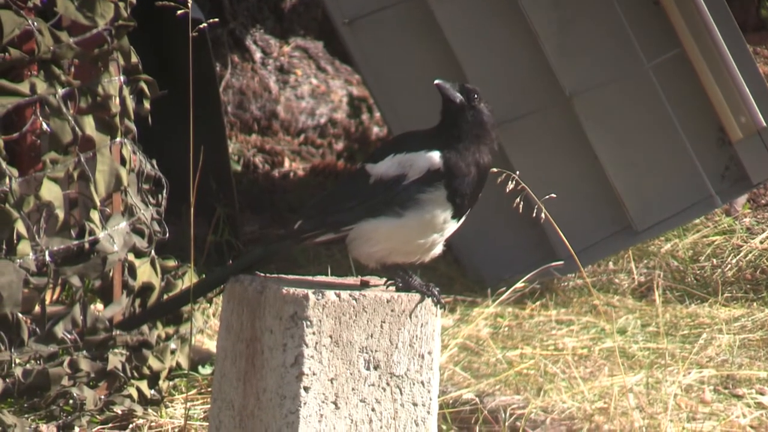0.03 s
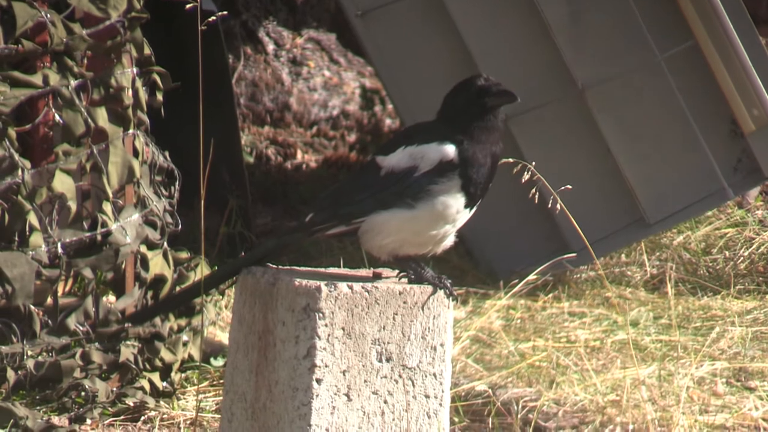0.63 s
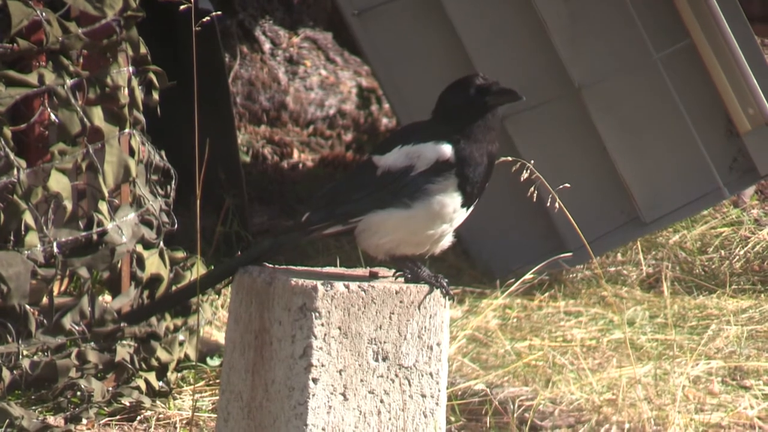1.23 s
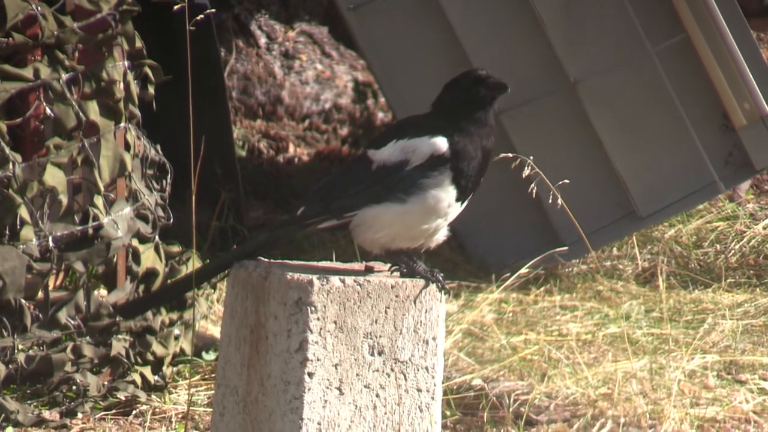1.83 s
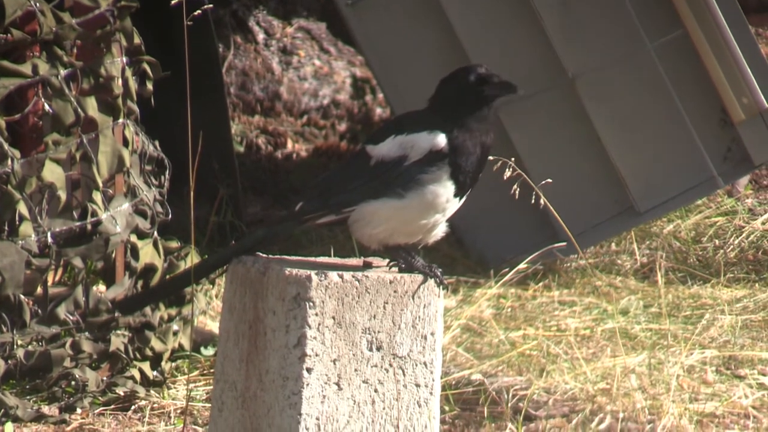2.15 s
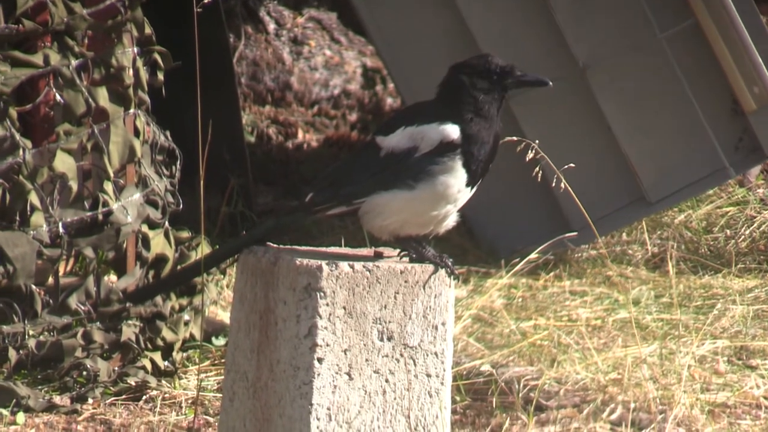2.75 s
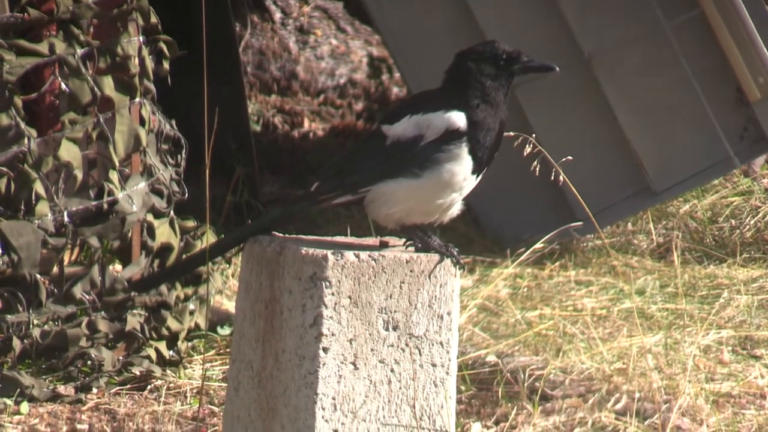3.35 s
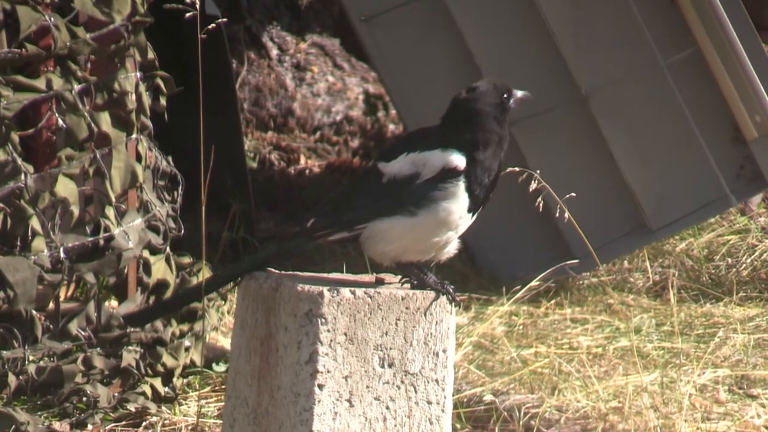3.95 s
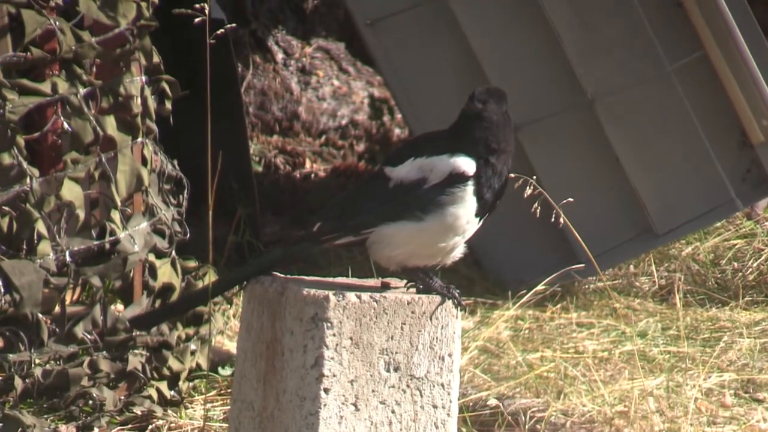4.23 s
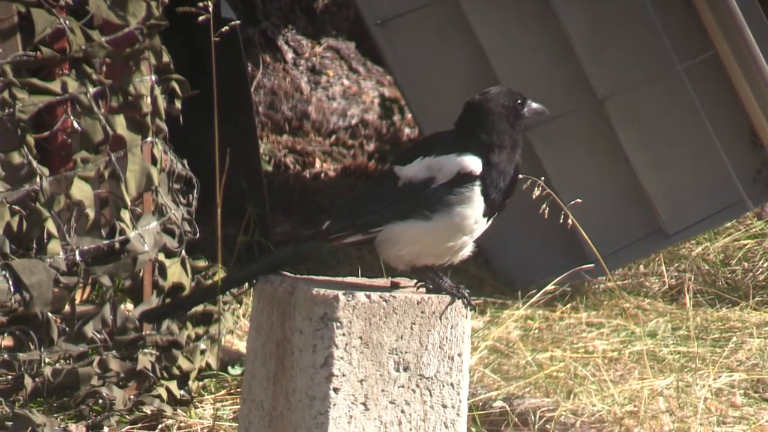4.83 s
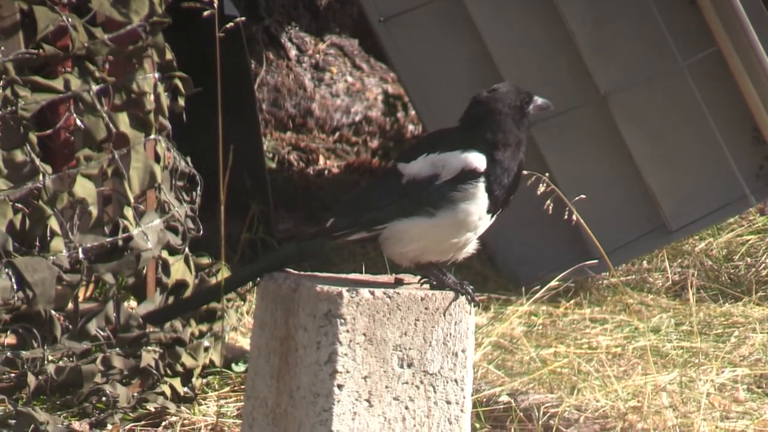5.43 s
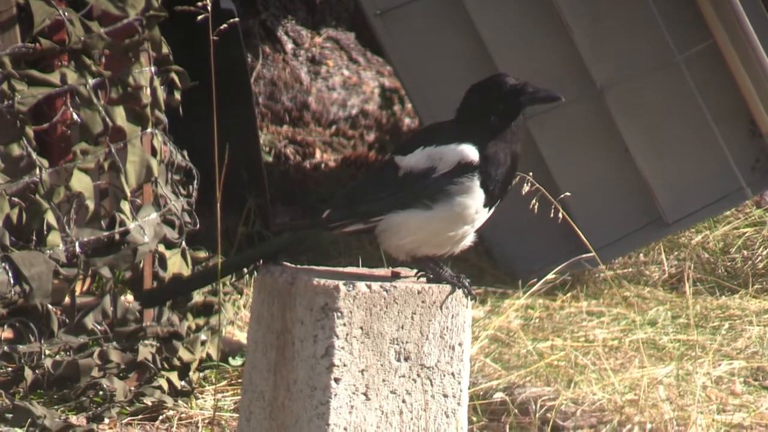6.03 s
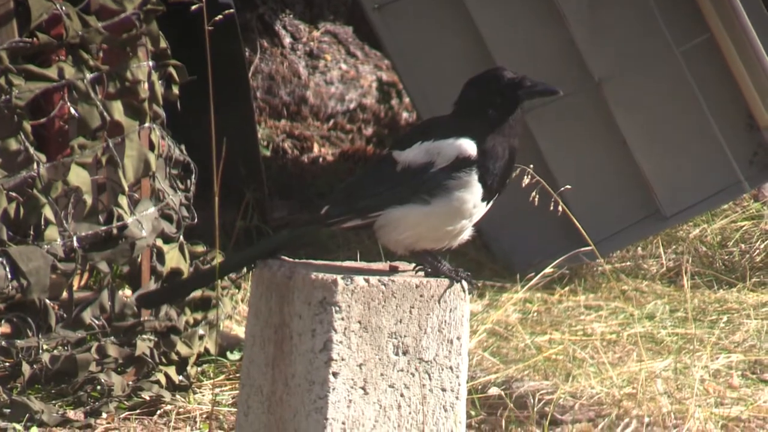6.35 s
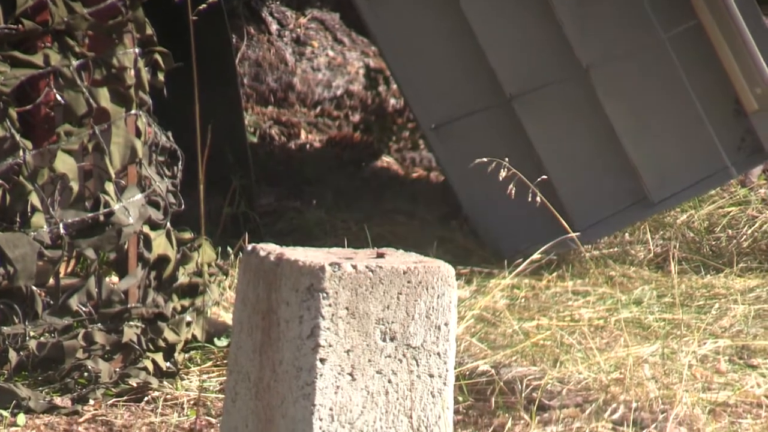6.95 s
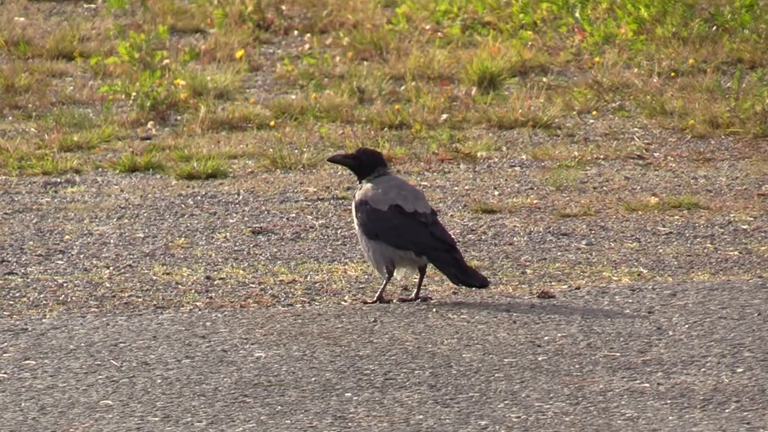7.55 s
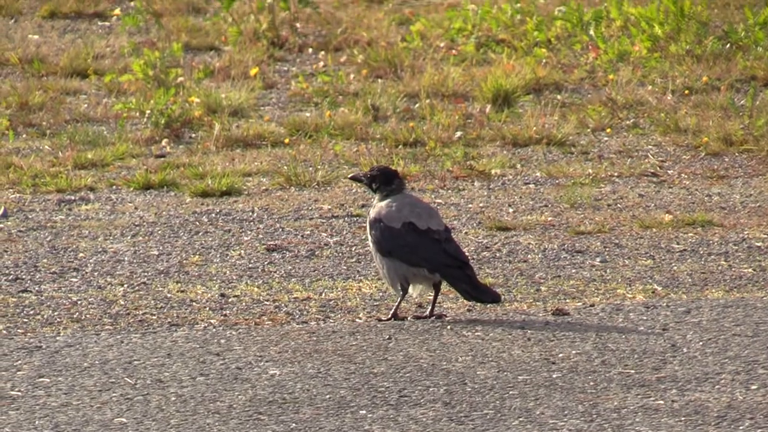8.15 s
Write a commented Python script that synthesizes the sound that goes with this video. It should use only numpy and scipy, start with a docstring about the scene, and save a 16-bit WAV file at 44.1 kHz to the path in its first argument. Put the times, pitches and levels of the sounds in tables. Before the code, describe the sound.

Three bouts of raspy magpie chatter ring around a yard in stereo, one bird close to the microphones and another softer and duller farther off. Faint songbird whistles and a low rush of distant traffic fill the gaps. Toward the third bout a nearby small bird chips, then trills over a soft high hiss. After an abrupt change to open roadside air, a crow caws hoarsely once and two faint chirps follow.

```python
"""A yard, on a stereo pair. Two magpies rattle at once, then twice more: the farther one softly, the near
one joining in harshly. Slapping membranes in the syrinx make the rasp; walls and trees throw it back.
Between rattles a warbler, then a two-note tit, whistle far off. From 4.9 s a close bird chips and trills
while a high hiss swells. At 7.1 s the scene switches to a roadside, where a crow gives one long hoarse
caw and two faint bird notes follow."""
import sys
import numpy as np
from scipy import signal
from scipy.fft import rfft, irfft
from scipy.io import wavfile
from scipy.ndimage import uniform_filter1d

SR = 44100
rng = np.random.default_rng(int(sys.argv[2]) if len(sys.argv) > 2 else 0)


def wav_out(sig):
    """Save sig, one row per channel (or a flat mono array), as 16-bit PCM at SR to the path in sys.argv[1]."""
    wavfile.write(sys.argv[1], SR, np.round(np.clip(np.atleast_2d(sig).T, -1, 1) * 32767).astype(np.int16))


N = 361619
TIME, BINS = np.arange(N) / SR, np.fft.rfftfreq(N, 1 / SR)
LEAD_IN = SR // 2  # samples before time zero, where the first rattles begin

# Near magpie, a row a rattle: t/s, syllables, first gap/s, gap growth/s, relative level/dB,
# syllable length/s, beak opening (a factor on the frequencies)
NEAR_RATTLES = [(-.117, 3, .1, .002, -14, .047, 1.015), (2.886, 6, .076, .005, -15.3, .0475, 1.015),
                (6.278, 6, .076, .0064, -15, .046, 1.03)]
# Its throat: f/Hz, gain/dB
NEAR_THROAT = [(250, -67), (450, -34.5), (600, -22.5), (900, -18), (1300, -8.5), (1750, -0.5), (2550, -4),
               (3300, -12), (4100, -18), (4700, -21), (5600, -29.5), (6600, -41), (8300, -45),
               (12000, -68.5)]
def near_magpie():
    """Harsh bursts close to the microphones, with a ring from the beak."""
    syllables = rattles(NEAR_RATTLES, first_db=-4, first_length=.95, fade_db=-.45, last_pause_s=.009)
    voice = magpie(syllables, NEAR_THROAT, pitch_hz=274.9, rough=.51, jitter=.12,
                   carrier_hz=2151, squawk_db=-12, sweep=.3)
    return voice + resonate(voice, 4570, 260)


# Magpie across the yard: columns as NEAR_RATTLES
FAR_RATTLES = [(-.075, 4, .124, -.0065, -35.8, .066, 1.02), (2.509, 7, .0707, 0, -36.4, .05, 1.0),
               (5.71, 6, .075, .0102, -34.7, .061, 1.01)]
# Its throat: f/Hz, gain/dB
FAR_THROAT = [(80, -55), (250, -37), (450, -26.5), (800, -24), (1100, -8.5), (1350, -2.5), (1750, -0.5),
              (2050, -10.5), (2350, -9), (3000, -19.5), (4200, -27), (5400, -40.5), (7000, -41.5),
              (12000, -62)]
def far_magpie():
    """Softer, duller rattles from farther off."""
    syllables = rattles(FAR_RATTLES, first_db=.3, first_length=.62, fade_db=-.2, last_pause_s=0)
    return magpie(syllables, FAR_THROAT, pitch_hz=290, rough=.58, jitter=.18,
                  carrier_hz=1456, squawk_db=-20.5, sweep=-.1)


def rattles(rows, first_db, first_length, fade_db, last_pause_s):
    """Syllables start short, then lengthen and fade: yields t/s, level/dB, length/s, beak opening."""
    for start, count, gap, slowing, db, length, beak in rows:
        for k in range(count):
            effort_db = fade_db * k if k else first_db
            s = start + k * gap + slowing * k * (k - 1) / 2 + last_pause_s * (k == count - 1)
            opening = beak * (1 + .014 * effort_db)  # a louder syllable opens the beak wider
            yield s, db + effort_db, length * (1 - (1 - first_length) / 2 ** k), opening


# Air pressure through a syllable: t/syllable lengths from its middle, level/dB
PRESSURE_ARCH = [(-.64, -31.5), (-0.5523, -12), (-.31, -8.5), (-.23, -1), (.03, 1.5), (.2, -0.5),
                 (0.415, -8), (0.512, -20.5), (0.67, -33)]
def magpie(syllables, throat, pitch_hz, rough, jitter, carrier_hz, squawk_db, sweep):
    """Each syllable is an arch of air pressure that lifts the pitch and the rasp."""
    out = np.zeros(LEAD_IN + N)
    for s, db, length, beak in syllables:
        t = np.arange(-length, length, 1 / SR)
        pressure = amp(follow(PRESSURE_ARCH, t / length)[0])
        hz = pitch_hz * beak * (1 + .15 * (pressure - 1))
        rasp = syrinx(hz, rough, jitter) * (.5 + .5 * pressure)
        tone = squawk(hz, carrier_hz * beak * (1 + sweep * (pressure - 1)))
        voice = steady(colour(rasp + amp(squawk_db) * tone, throat, beak), span_s=.003)
        add(out, LEAD_IN / SR + s - length, amp(db) * pressure * voice * signal.windows.tukey(len(t), .3))
    return out


def syrinx(hz, rough, jitter):
    """Membranes slap shut at an uneven rate; each cycle lets out a puff of noise."""
    turns = np.cumsum(hz * (1 + jitter * drift(len(hz), .003))) / SR + rng.random()
    slaps = np.diff(np.floor(turns), prepend=0) * amp(2.16 * drift(len(hz), .002))
    puffs = (.49 + np.exp(-(turns % 1) / .9)) * rng.standard_normal(len(hz))
    return (1 - rough) * unit(slaps) + rough * unit(puffs)


def squawk(hz, carrier_hz, glide=.63, wobble=.1156):
    """The second side of the syrinx: a high tone swept upward about hz times a second."""
    turns = np.cumsum(hz * (1 + .1 * drift(len(hz), .003))) / SR + rng.random()
    swept_hz = carrier_hz * (1 + glide * (turns % 1 - .5) + wobble * drift(len(hz), .00068))
    return unit(np.sin(2 * np.pi * np.cumsum(swept_hz) / SR))


# Roadside crow, pitch of the caw: t/s, f/Hz
CAW_PITCH = [(7.16, 255), (7.22, 243), (7.26, 260), (7.31, 298), (7.44, 283), (7.55, 255), (7.62, 250)]
# Hoarse at first, then clearer: t/s, roughness/0-1
CAW_ROUGH = [(7.17, .76), (7.31, .44), (7.5, .29)]
# Its throat: f/Hz, gain/dB
CROW_THROAT = [(200, -38.5), (450, -18), (600, -9.5), (800, -14), (1150, 3), (1500, 2.5), (1800, -5),
               (2100, -5.5), (2650, -2), (3200, -21), (3900, -24), (4700, -7), (5400, -13.5), (7000, -33),
               (11000, -72)]
def crow(start_s=7.166, peak_s=7.49, end_s=7.613, attack_s=.034, release_s=.024, throb_hz=38):
    """A hoarse pulse train through a throat with one strong resonance; it throbs most near the peak."""
    t = np.arange(start_s, end_s, 1 / SR)
    hz, rough = follow(CAW_PITCH, t)[0], follow(CAW_ROUGH, t)[0]
    from_deepest_s = t - 7.484
    depth = .27 + .41 * np.exp(-(from_deepest_s / .055) ** 2)
    throb = depth * np.cos(2 * np.pi * throb_hz * from_deepest_s)
    voice = colour(syrinx(hz * (1 + .04 * throb), rough, jitter=.06 * rough), CROW_THROAT)
    ring_db = np.interp(t, [7.33, 7.5], [5, 8])
    voice = voice + amp(ring_db) * band(voice, 5 * hz, 250)  # the resonance rides on the fifth harmonic
    level_db = -27.7 + np.minimum(15 * (t - peak_s), 35 * (peak_s - t))  # swells, then sags
    edges = np.clip(np.minimum((t - start_s) / attack_s, (end_s - t) / release_s), 0, 1)
    out = np.zeros(N)
    add(out, start_s, amp(level_db) * edges * steady(voice, span_s=.013) * (1 + throb))
    return out


# Close songbird's figures, a row a note: t/s in the figure, length/s, start f/Hz, end f/Hz, level/dB
CHIP = [(-.083, .012, 2700, 2150, -11), (-.066, .016, 2650, 2100, -9), (-.046, .016, 2850, 2080, -6),
        (0, .017, 2850, 1700, 0)]
HIGH_SLUR = [(-.052, .042, 6450, 6000, -8), (-.002, .038, 7050, 4450, 1), (.037, .012, 4550, 5400, 1)]
FLOURISH = [(-.047, .013, 4200, 5050, -9), (-.026, .015, 5150, 3800, -4), (-.002, .038, 4080, 3380, 0),
            (.023, .008, 3280, 2330, -3.5), (.04, .018, 3550, 4130, -3.5)]
SWOOP = [(-.026, .027, 2750, 3450, -9), (0, .02, 4850, 3250, 0), (.014, .018, 3530, 2360, 0)]
# Its stuttered chips: t/s, level/dB
CHIPS = [(4.912, -51.5), (5.224, -48.5), (5.558, -43.5), (6.224, -47)]
# Its trills: figure, t/s, repeats, period/s, level/dB, rise per repeat/dB
CLOSE_TRILLS = [(HIGH_SLUR, 5.791, 3, .168, -60, 5), (FLOURISH, 6.292, 5, .155, -37, .4),
                (SWOOP, 7.033, 2, .085, -35.5, 0)]
def close_songbird():
    """A small bird in nearby leaves chips, then sings a chain of trills that grow louder."""
    chips = whistles([note for s, db in CHIPS for note in figure(CHIP, s, db)], waver=.03)
    return among_leaves(chips + whistles(trills(CLOSE_TRILLS), waver=.021))


# Figures of a warbler and a tit: columns as CHIP
WARBLE = [(0, .052, 3250, 4100, -2), (.115, .06, 2850, 2730, 0)]
TIT_PAIR = [(0, .055, 3600, 3290, -5.5), (.058, .13, 3295, 3250, -1.2), (.289, .105, 4470, 4390, 1)]
# Their turns: columns as CLOSE_TRILLS
FAR_TRILLS = [(WARBLE, 1.68, 3, .197, -66, 0), (TIT_PAIR, 3.69, 3, .555, -57.5, 1.3)]
def warbler_and_tit():
    """Two birds whistle one after the other, far off in the trees."""
    return whistles(trills(FAR_TRILLS), waver=.011)


# Distant single notes: t/s, length/s, start f/Hz, end f/Hz, relative level/dB
LONE_NOTES = [(.36, .22, 4720, 4600, -66), (.8, .052, 5560, 5330, -68), (.98, .077, 4980, 4820, -67),
              (1.3, .053, 3000, 3800, -61), (1.33, .073, 2770, 2870, -62), (1.46, .052, 3590, 2990, -63),
              (1.47, .053, 4650, 4300, -63.5), (1.53, .08, 3850, 4100, -63), (4.58, .17, 3200, 2850, -60),
              (5.58, .16, 3380, 3340, -55), (7.735, .043, 2440, 3420, -62), (8.13, .091, 2800, 4300, -67)]
def lone_birds():
    """Scattered whistles far from the microphones, in both places."""
    return whistles(LONE_NOTES, waver=.016)


def whistles(notes, waver):
    """Nearly pure notes that glide from one pitch to another."""
    out = np.zeros(N)
    for s, length, start_hz, end_hz, db in notes:
        size = int(length * SR)
        hz = np.geomspace(start_hz, end_hz, size) * (1 + waver * drift(size, .002))
        tone = np.sin(2 * np.pi * np.cumsum(hz) / SR)
        add(out, s, amp(db) * unit(tone * signal.windows.tukey(size, .7)))
    return out


def figure(notes, s, db):
    """The notes of a figure sung at time s."""
    return [(s + at, length, start_hz, end_hz, db + note_db)
            for at, length, start_hz, end_hz, note_db in notes]


def trills(rows):
    """Each trill repeats its figure at an even pace, rise_db louder each time."""
    return [note for notes, s, count, period, db, rise_db in rows for k in range(count)
            for note in figure(notes, s + k * period, db + k * rise_db)]


def among_leaves(song):
    """Leaves scatter a small bird's note at once; the surroundings add a tail."""
    scattered = echo(song, [(2000, .05), (6000, .05)], delay_s=0)
    tail = echo(song, [(2000, .5), (6000, .52)], delay_s=.011)
    return .85 * song + .5 * scattered + amp(-3.5) * tail


# Treble that the near magpie's beak aims at the yard: f/Hz, gain/dB
BEAK_BEAM = [(500, 0.5), (1500, -0.5), (2000, -7.5), (2700, -1), (3400, -4.5), (4600, 7), (6000, 15.5),
             (8500, 17.5), (12000, 3)]
# Late echo from the trees: f/Hz, t60/s
TREE_DECAY = [(200, .7), (1000, 2.9), (1700, 1.85), (3000, 1.5), (4600, 0.97), (9000, 0.86)]
def yard_echoes(near, far, song):
    """Walls return the magpies quickly; trees ring on with them and the distant song."""
    beamed = colour(near, BEAK_BEAM)
    far = far + amp(7) * resonate(far, 4100, 700)  # its treble arrives mostly by way of the walls
    walls = echo(amp(-14) * beamed + amp(-2.5) * far, [(500, .17), (5000, .39)], delay_s=.015)
    ringing = beamed + amp(2) * resonate(beamed, 4640, 220)
    trees = echo(amp(-26) * ringing + amp(-11) * far, TREE_DECAY, delay_s=.03)
    trees += amp(.5) * echo(song, [(2500, 1.25), (5000, 1.05)], delay_s=.012)
    return walls * amp([[-2], [2]]) + trees * amp([[-.7], [.7]])


# Ticks in the yard's grass: t/s, level/dB, centre f/Hz, decay/s
GRASS_TICKS = [(1.5677, -55, 7500, 0.0056), (4.0735, -59, 12600, 0.0082), (4.1638, -63, 10100, 0.0032),
               (5.305, -47, 4000, 0.023), (5.641, -50, 4010, 0.018)]
def grass_ticks():
    """Short dry snaps: bands of noise that die at once."""
    out, t = np.zeros(N), np.arange(SR // 10) / SR
    for s, db, hz, decay in GRASS_TICKS:
        snap = band(rng.standard_normal(len(t)), hz, hz / 4)
        add(out, s, amp(db) * unit(snap) * np.exp(-t / decay))
    return out


# Hiss in the yard, alike at both microphones: t/s, level/dB, centre f/Hz
HISS_SWELL = [(0, -64, 4580), (1.2, -70.5, 4380), (1.9, -83, 4500), (2.5, -82, 5400), (3.7, -68.5, 6470),
              (4.1, -66.5, 6220), (4.6, -59.5, 5850), (5.0, -56.3, 5360), (5.4, -55.5, 5000),
              (5.8, -63, 4980), (6.4, -45.3, 4950), (7.13, -59.5, 4930)]
# Its overall colour: f/Hz, gain/dB
HISS_BAND = [(2000, -22.5), (3800, -1), (5000, -3), (6400, -4.5), (7200, -9), (9000, -25.5)]
def high_hiss():
    """A high band of noise that wanders in pitch, sinks and swells."""
    db, hz = follow(HISS_SWELL, TIME)
    return amp(db) * unit(colour(band(rng.standard_normal(N), hz, 2200), HISS_BAND))


# Traffic far beyond the yard: t/s, level/dB
TRAFFIC_LEVEL = [(0, -78.5), (2.2, -68.5), (2.8, -66.5), (3.7, -59.5), (5.1, -62.5), (7.13, -65)]
def traffic():
    """A distant rush that rises and eases."""
    spectrum = [(100, -42), (300, -16), (450, -2.5), (620, -10.5), (1200, -21), (3000, -7), (6000, -52.5)]
    return amp(follow(TRAFFIC_LEVEL, TIME)[0]) * air(spectrum, flutter_db=2.1)


# Likeness of the air at the two microphones: f/Hz, correlation/0-1
AIR_LIKENESS = [(30, .7), (300, 0.63), (600, 0.2), (1200, 0), (3000, 0.16)]
def air(spectrum, flutter_db):
    """Diffuse outdoor noise, alike on both sides in the bass, gently wavering."""
    left, other = rfft(rng.standard_normal((2, N)))
    same = read(AIR_LIKENESS, BINS)
    right = same * left + np.sqrt(1 - same ** 2) * other
    noise = irfft(np.array([left, right]) * amp(read(spectrum, BINS)), N)
    return noise / np.std(noise.mean(0)) * amp(flutter_db * drift(N, .42))


# Bearing of each magpie: f/Hz, lead at the left microphone/rad
NEAR_PHASE = [(300, -0.089), (1700, -0.028), (2150, 1), (2670, 1), (3000, -0.086)]
FAR_PHASE = [(300, 0.62), (800, -1.15), (1400, -1.42), (2400, -2.42), (3200, -1)]
# Foliage between the farther magpie and the microphones: f/Hz, gain/dB
HEDGE = [(2000, -1), (3000, -5.5), (4500, -10.5), (9000, -17.5)]
# Air of the yard: f/Hz, relative level/dB
YARD_AIR = [(25, -19), (55, -18), (80, -10), (110, -16), (330, -5), (430, -2.5), (650, -9.5), (1000, -13.5),
            (1900, -11.5), (2800, -9), (4500, -15), (6400, -23), (8500, -24), (13500, -29.5)]
def yard(lone):
    """One magpie close, one behind foliage, songbirds far off; around them echoes, traffic and air."""
    near, far = near_magpie(), far_magpie()
    song = lone + warbler_and_tit()
    hiss, rush = high_hiss(), traffic()
    direct = place(near, NEAR_PHASE, left_db=-3)
    direct += amp(.5) * place(colour(far, HEDGE), FAR_PHASE, left_db=-10.5)
    direct += amp(-4) * song + grass_ticks() + hiss
    echoes = yard_echoes(near, far, song)
    floor = amp(-61.5) * air(YARD_AIR, flutter_db=.5) + rush
    return direct + echoes + floor * amp([[-.7], [.7]])


# Bearing of the crow: f/Hz, lead at the left microphone/rad
CROW_PHASE = [(200, 0.47), (600, 1.97), (1400, 1.75), (2500, 1.56), (3200, 0.95)]
# Air of the roadside: f/Hz, relative level/dB
ROAD_AIR = [(25, -16.5), (110, -18), (350, -11), (470, -9), (620, -17.5), (1200, -6), (1700, -20.5),
            (2500, -16), (3700, -25), (5000, -23), (6400, -36), (8400, -40), (13500, -48.5)]
def roadside():
    """The crow on open ground, left of centre, with a faint long echo from trees."""
    caw = crow()
    direct = amp(1) * place(caw, CROW_PHASE, left_db=2.5)
    ground = amp(-9) * echo(caw, [(500, .08), (5000, .08)], delay_s=.003)
    trees = amp(-13) * echo(caw, [(400, .8), (1300, .65), (2500, .9), (6000, 1.7)], delay_s=.027)
    return direct + ground + trees * amp([[2.5], [-2.5]]) + amp(-58.5) * air(ROAD_AIR, flutter_db=2.6)


def place(x, phase, left_db):
    """A bearing: left and right differ in phase and, below 3200 Hz, in level."""
    lean = amp(left_db / 2 * (BINS < 3200)) * np.exp(.5j * read(phase, BINS))
    return irfft(rfft(x[-N:]) * np.array([lean, 1 / lean]), N)


def echo(x, t60, delay_s):
    """Sparse reflections, other ones at each microphone, dying by the table t60: f/Hz, t60/s."""
    shape = (2, 3 * SR // 2)
    taps = rng.choice([-1., 1.], shape) * (rng.random(shape) < 2500 / SR)  # about 2500 a second
    hz, t, spectra = signal.stft(taps, SR, nperseg=256)
    tail = signal.istft(spectra * amp(-60 * t / read(t60, hz)[:, None]), SR)[1]
    tail = np.pad(tail / np.linalg.norm(tail[0]), ((0, 0), (int(delay_s * SR), 0)))
    return signal.fftconvolve(x[None], tail, axes=1)[:, len(x) - N:len(x)]


def colour(x, points, stretch=1, size=4096):
    """Causal filter with the given spectrum, its frequencies scaled by stretch."""
    log_gain = np.log(amp(read(points, abs(np.fft.fftfreq(size, 1 / SR)) / stretch)))
    taps = np.fft.ifft(np.exp(np.conj(signal.hilbert(log_gain)))).real
    return signal.fftconvolve(x, taps[:size // 2])[:len(x)]


def resonate(x, hz, width_hz):
    """A resonance of gain 1 that follows the curve hz."""
    turn = np.exp(2j * np.pi * np.cumsum(hz * np.ones(len(x))) / SR)
    pole = np.exp(-np.pi * width_hz / SR)
    return 2 * (turn * signal.lfilter([1 - pole], [1, -pole], x / turn)).real


def band(x, hz, width_hz):
    """The same resonance twice, for steeper sides."""
    return resonate(resonate(x, hz, width_hz), hz, width_hz)


def steady(x, span_s):
    """Evens out the level, so that an envelope alone sets the loudness."""
    window = np.hanning(2 * int(span_s * SR) + 3)
    power = signal.fftconvolve(x ** 2, window / window.sum(), "same")
    return x / np.sqrt(abs(power) + .02 * np.mean(x ** 2))


def drift(size, span_s):
    """Smooth random wander of rms 1."""
    return unit(uniform_filter1d(rng.standard_normal(size), max(int(span_s * SR), 1)))


def amp(db):
    """Decibels to gain."""
    return 10 ** (np.asarray(db) / 20)


def unit(x):
    """Scales to rms 1."""
    return x / np.sqrt(np.mean(x ** 2) + 1e-20)


def read(points, hz):
    """A spectrum table on a log-frequency axis."""
    f, value = np.transpose(points)
    return np.interp(np.log(hz + 1), np.log(f + 1), value)


def follow(rows, t):
    """The columns of a curve table at times t."""
    s, *columns = np.transpose(rows)
    return [np.interp(t, s, c) for c in columns]


def add(mix, s, sound):
    """Mixes a sound in from time s."""
    start = round(s * SR)
    sound = sound[max(-start, 0):]
    part = mix[max(start, 0):][:len(sound)]
    part += sound[:len(part)]


SWITCH_S, SWITCH_FADE_S = 7.131, .003
def scene():
    """First the yard, then the roadside; small birds sing in both."""
    close_song, lone = close_songbird(), lone_birds()
    in_yard = np.clip(.5 + (SWITCH_S - TIME) / SWITCH_FADE_S, 0, 1)
    by_road = 1 - in_yard
    return in_yard * (yard(lone) + close_song) + by_road * (roadside() + among_leaves(lone * by_road))


# Stereo width of the sound, nearly mono above 3.2 kHz: f/Hz, side gain/dB
STEREO_WIDTH = [(100, -2), (2700, 1), (3100, -2), (3500, -46), (9000, -28)]
def record(dry):
    """The stereo image narrows in the treble, and the band ends at 13.6 kHz."""
    mid = dry.mean(0)
    side = irfft(rfft(dry[0] - dry[1]) / 2 * amp(read(STEREO_WIDTH, BINS)), N)
    low_pass = signal.firwin(511, 13600, window=("kaiser", 9), fs=SR)
    return signal.oaconvolve(np.array([mid + side, mid - side]), low_pass[None], "same", axes=1)


dry = scene()
out = record(dry)
wav_out(out)
```